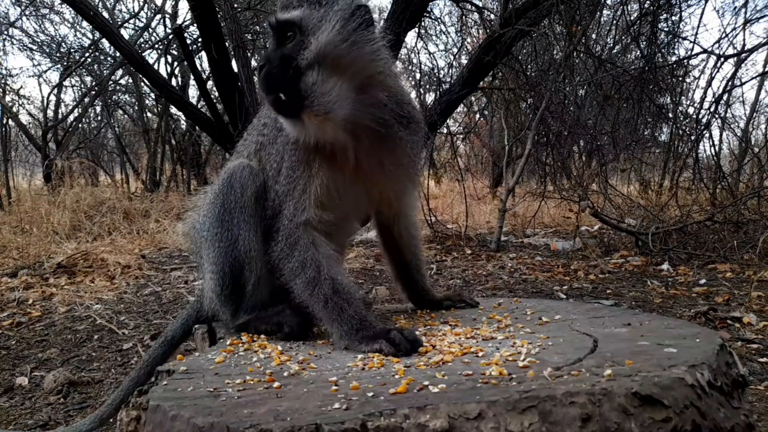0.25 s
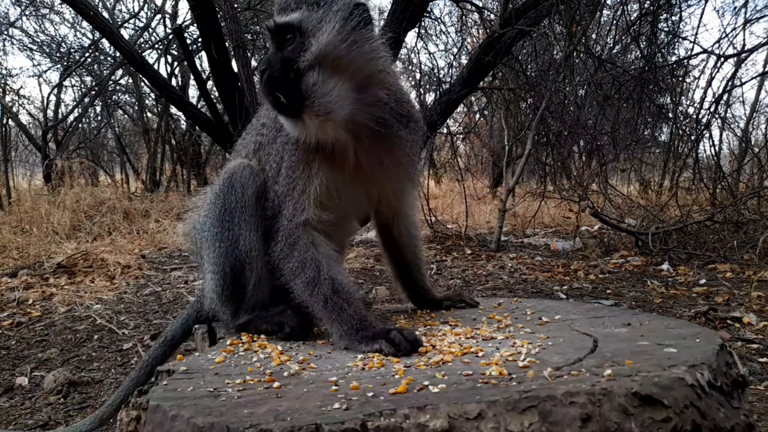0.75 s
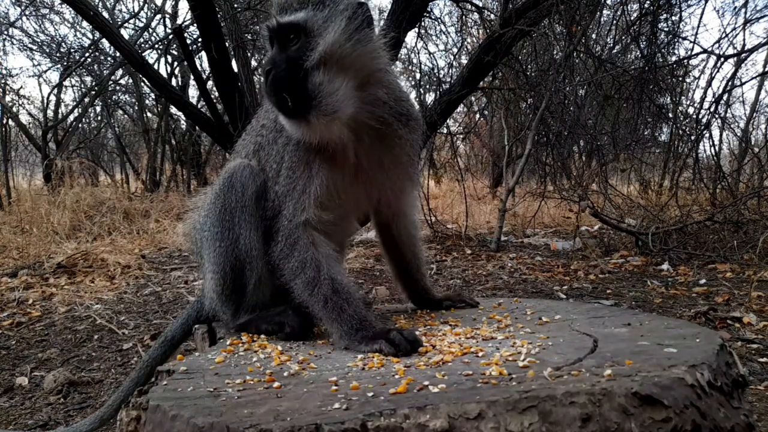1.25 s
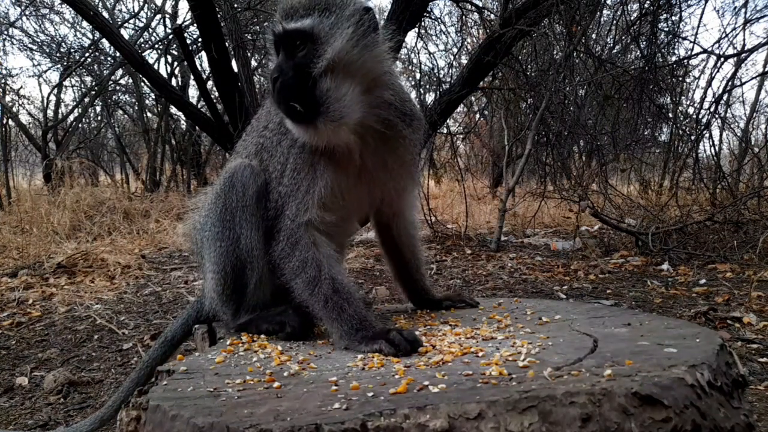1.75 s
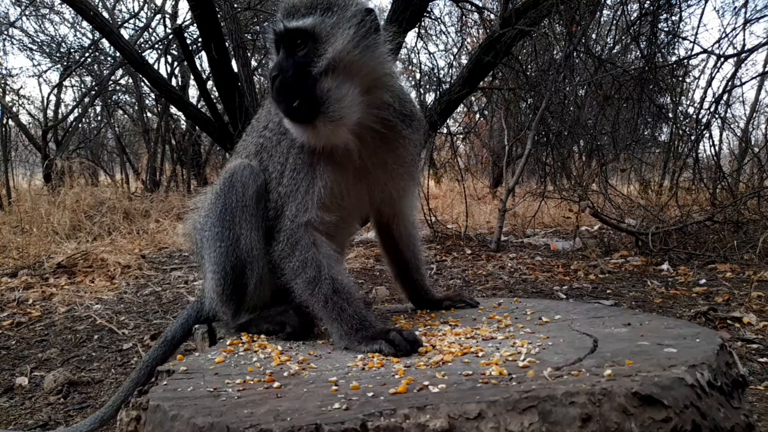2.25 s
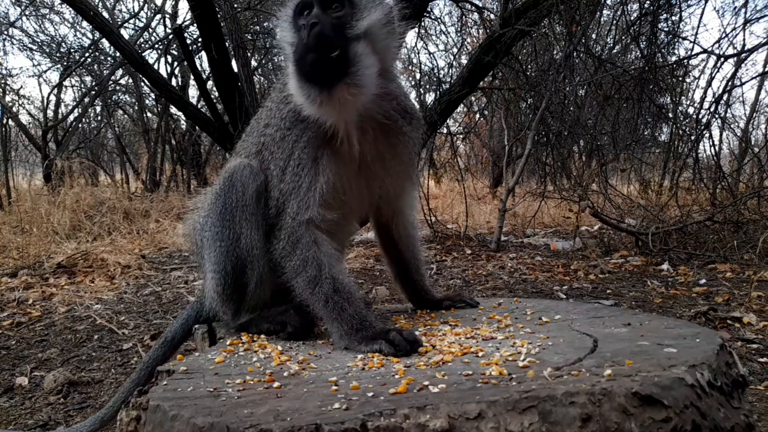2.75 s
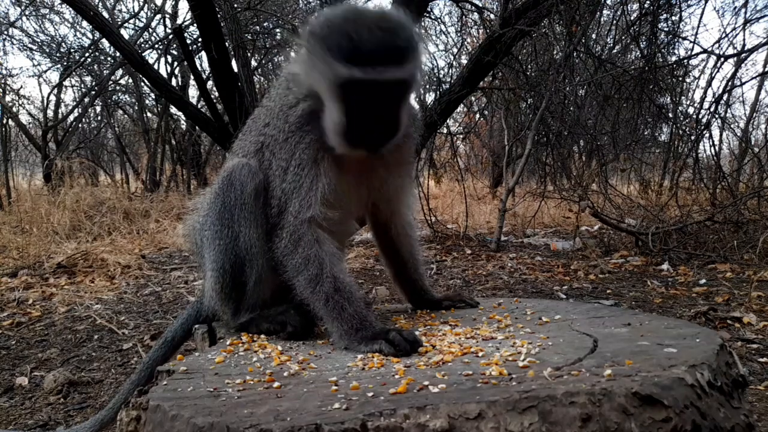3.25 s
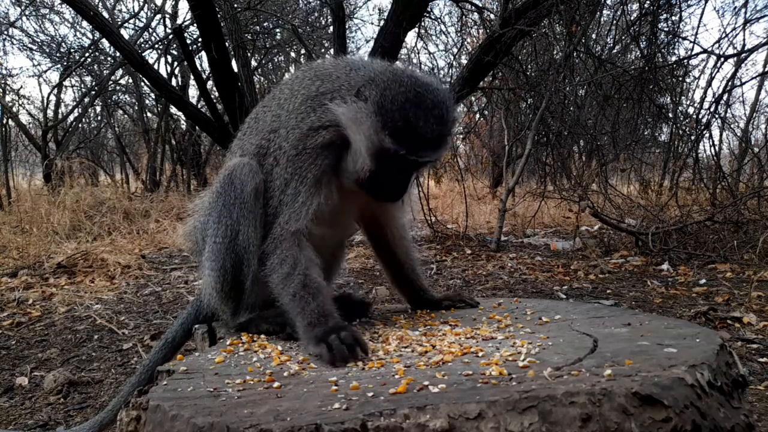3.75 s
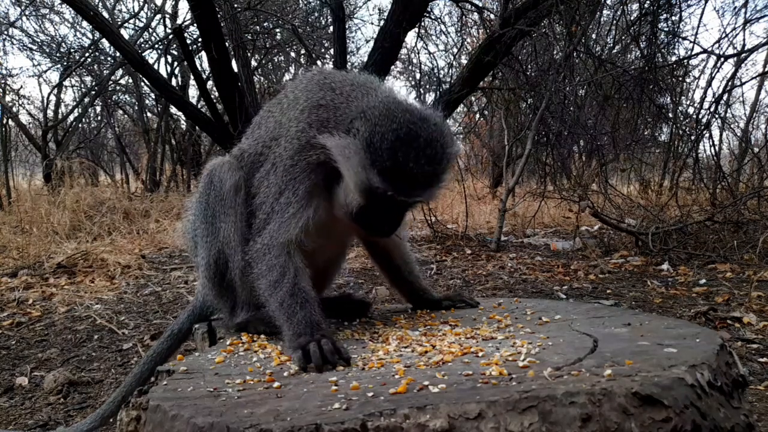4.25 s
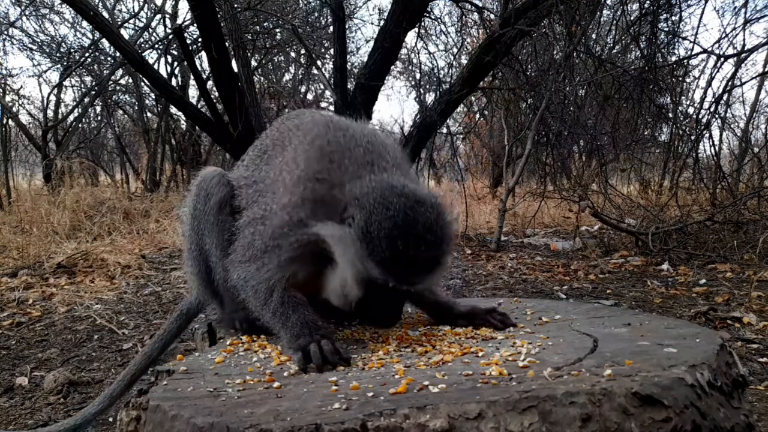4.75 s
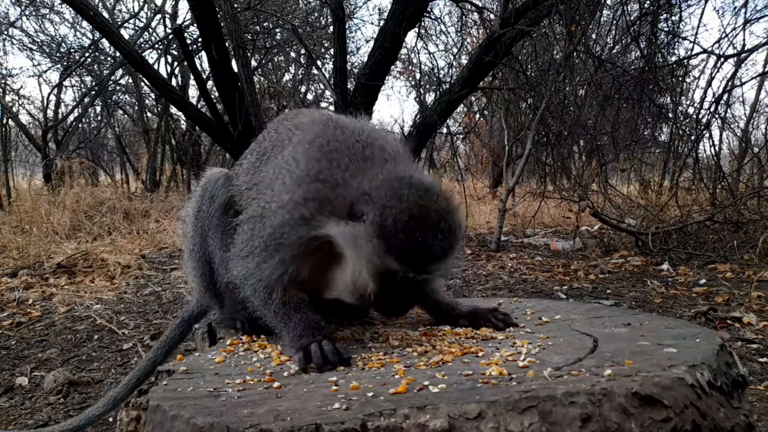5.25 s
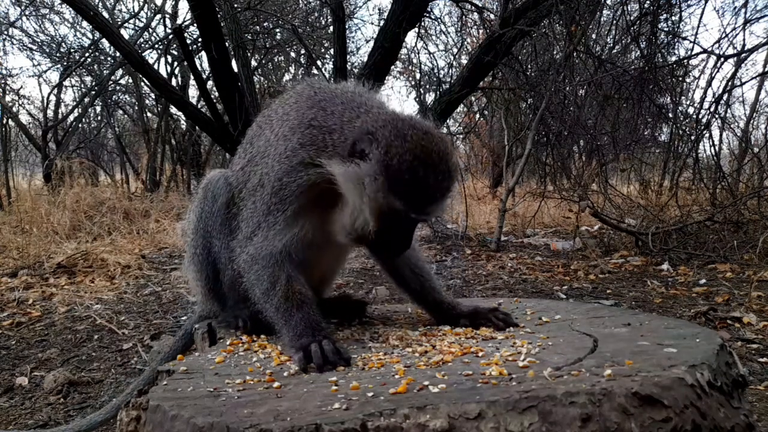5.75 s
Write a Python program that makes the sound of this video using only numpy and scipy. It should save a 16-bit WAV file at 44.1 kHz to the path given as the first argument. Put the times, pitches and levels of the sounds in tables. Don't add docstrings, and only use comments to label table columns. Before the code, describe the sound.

Quiet dry bush: faint kernel cracks and tiny ticks from a chewing monkey, then one deep wooden thump and soft taps on a stump.

```python
import sys
import numpy as np
from scipy import signal
from scipy.io import wavfile

SR = 44100
rng = np.random.default_rng(int(sys.argv[2]) if len(sys.argv) > 2 else 0)


def to_wav(sig):
    pcm = np.clip(np.atleast_2d(sig), -1, 1) * 32767
    pcm = np.round(pcm).astype(np.int16)
    wavfile.write(sys.argv[1], SR, pcm.T)


N = 264644


def from_db(db):
    return 10 ** (np.asarray(db, float) / 20)


def rms_one(x):
    return x / np.sqrt(np.mean(x ** 2) + 1e-20)


def in_time(rows):
    s, *columns = np.transpose(rows)
    return [np.interp(np.arange(N) / SR, s, column) for column in columns]


def at_hz(points, hz):
    point_hz, db = np.transpose(points)
    return np.interp(np.log(hz), np.log(point_hz), db, -90, None)


def pan(x, left_db, lag_s=0.):
    late = np.interp(np.arange(N) - lag_s * SR, np.arange(N), x)
    return np.array([x * from_db(left_db / 2), late * from_db(-left_db / 2)])


def drift(rate):
    r = np.exp(-80 * np.pi * rate / SR)
    slow = signal.lfilter([1], [1, -2 * r, r * r], rng.standard_normal(N // 40 + 2002))[2000:]
    return np.interp(np.arange(N) / 40, np.arange(len(slow)), rms_one(slow))


def ring(force, hz, t60):
    r, w = from_db(-60 / (t60 * SR)), 2 * np.pi * hz / SR
    return signal.lfilter([0, np.sin(w)], [1, -2 * r * np.cos(w), r * r], force + 1e-18)


def soft_onset(t, rise_s):
    return 1 - np.exp(-t / rise_s)


def soft_note(t, db, hz, t60, rise_s):
    return from_db(db - 60 * t / t60) * soft_onset(t, rise_s) * np.sin(2 * np.pi * hz * t)


def resonant_noise(hz, width_hz, channels, size=N):
    r = np.exp(-np.pi * width_hz / SR)
    section = [1, 0, -1, 1, -2 * r * np.cos(2 * np.pi * hz / SR), r * r]
    noise = rng.standard_normal((channels, size + SR // 2))
    return rms_one(signal.sosfilt([section, section], noise)[:, SR // 2:])


def near_echoes(x, level_db, t60):
    t = np.arange(round(.08 * SR)) / SR
    dull = signal.lfilter([1], [1, -.6], rng.standard_normal((2, len(t))))
    tail = dull * from_db(-60 * t / t60) * (t > .0015)
    return x + from_db(level_db) * signal.fftconvolve(x, tail, axes=1)[:, :N]


def swell_db(s, rise_s, hold_s, fall_db_per_s):
    t = np.arange(N) / SR - s
    return 36.5 * np.minimum(t, 0) / rise_s - fall_db_per_s * np.maximum(t - hold_s, 0)


# (time [s], cheek level [dB], mouth level [dB], mouth note [Hz])
CRACKS = [(0.1618, -58.5, -63, 1510), (0.1706, -56, -61.5, 2010), (0.6508, -58, -52, 1730),
          (0.6541, -63, -51, 1900), (0.6645, -65, -66, 2060), (1.229, -75, -71, 2070),
          (1.393, -70, -69, 1700), (1.465, -63.5, -63.5, 2080), (1.4797, -65, -65, 2140),
          (1.706, -58.5, -62.5, 1850), (1.7561, -82, -74, 2000), (1.76, -47, -44.5, 2160),
          (2.111, -60, -65, 1360), (3.4929, -60.5, -56, 1870), (3.4949, -61, -62, 2420),
          (4.222, -67.5, -61, 2080)]
# (time [s], dull level [dB], dull note [Hz], hard level [dB], hard note [Hz])
KNOCKS = [(3.472, -66, 511, -89, 1890), (3.730, -41.5, 695, -58, 1500), (3.760, -39, 736, -56, 1600),
          (3.765, -57.5, 1000, -46.5, 1600), (3.736, -38.5, 635, -45, 1250), (3.784, -55, 800, -63, 1797),
          (3.858, -56, 597, -68, 1250), (3.889, -75, 1050, -73, 1380), (3.895, -74, 1050, -74, 1250),
          (3.904, -70, 1150, -67, 1980), (5.2585, -56, 910, -71, 2210), (5.264, -70, 1110, -62.5, 2400),
          (5.511, -69, 494, -67, 1250), (5.632, -55.5, 610, -70, 1300), (5.764, -69, 646, -80, 2120)]


def cracks():
    out, size = np.zeros(N + 2000), 1300
    t = np.arange(size) / SR
    click = (t == 0) * 1.
    rows = [(s, cheek_db, 775 + 15 * rng.standard_normal(), mouth_db, mouth_hz)
            for s, cheek_db, mouth_db, mouth_hz in CRACKS]
    rows += KNOCKS
    fragments = rng.standard_normal((len(rows), size))
    for (s, dull_db, dull_hz, hard_db, hard_hz), ragged in zip(rows, fragments):
        splinter = click + .1 * ragged * np.exp(-t / .001)
        hollow = soft_onset(t, 0.00079) * ring(click, dull_hz, 0.0099)
        hard = soft_onset(t, 0.00022) * ring(splinter, hard_hz, 0.0042)
        shell_edge = ring(splinter, 3800, 0.006)
        sound = from_db(dull_db + 14.0) * hollow + from_db(hard_db + 11.0) * hard
        sound += from_db(hard_db + 1.0) * shell_edge
        out[round((s + .0008) * SR):][:size] -= sound
    return out[:N]


# (time [s], level [dB], ping [Hz])
PICKS = [(0.281, -62, 1950), (2.2047, -54, 2030), (2.211, -68, 2010), (2.219, -60, 2050),
         (4.962, -66, 2260), (4.976, -71, 2300), (4.9845, -59.5, 2310), (5.006, -74, 2300),
         (5.0255, -72, 1950), (5.032, -64, 2000), (5.039, -70, 2000), (5.169, -62, 1660),
         (5.2295, -63, 1950), (5.390, -63, 2150), (5.407, -63, 2100), (5.765, -68, 2050),
         (5.938, -66, 2150)]


def picks():
    out, t = np.zeros(N + 1500), np.arange(1500) / SR
    for s, db, hz in PICKS:
        out[round(s * SR):][:1500] += soft_note(t, db, hz, t60=0.016, rise_s=0.00058)
    return out[:N]


# (time [s], tick level [dB], tick note [Hz], snap level [dB])
TICKS = [(0.17, -55, 5900, -83), (0.205, -59, 5800, -80), (0.211, -62, 5700, -85), (0.3288, -67, 4750, -71),
         (0.655, -64, 5600, -75), (0.663, -64, 5560, -80), (0.9315, -61, 6390, -86),
         (1.0176, -66, 6130, -72), (1.4655, -56.5, 6000, -87), (1.7552, -55, 6700, -70),
         (1.7603, -52, 6240, -67), (2.207, -59.5, 6630, -70), (2.831, -68, 6390, -71),
         (3.493, -70, 4530, -82), (3.779, -64, 10500, -69), (3.858, -59.5, 4500, -85),
         (3.9044, -59, 10700, -73), (3.905, -63, 8000, -85), (4.2228, -56, 4550, -64),
         (4.6594, -69, 6400, -74), (4.6935, -68, 6500, -73), (4.9617, -62, 5430, -67),
         (5.0255, -63, 5400, -78), (5.032, -66, 5300, -83), (5.055, -68, 4950, -86.5),
         (5.149, -66, 6840, -58.5), (5.168, -58.5, 5250, -76), (5.23, -70, 5220, -67),
         (5.235, -74, 5600, -69), (5.2614, -57.5, 4740, -66), (5.3625, -61.5, 5800, -85),
         (5.3901, -62, 4950, -77), (5.8367, -59, 5870, -78), (5.938, -67, 5650, -70),
         (5.766, -66, 4200, -85)]
TICK_LEFT_DB, SNAP_LEFT_DB = -1.5, 9


def ticks():
    out, size = np.zeros((2, N + 1000)), 500
    sides = np.array([[.5], [-.5]])
    t = np.arange(size) / SR
    fragments = rng.standard_normal((len(TICKS), 2, 2, size))
    for (s, tick_db, tick_hz, snap_db), ragged in zip(TICKS, fragments):
        splinter = (t == 0) + 0.61 * ragged * np.exp(-t / 0.0011)
        tick = soft_onset(t, 0.00008) * ring(splinter[0], tick_hz, 0.0022)
        snap = np.diff(ring(splinter[1], 12000, 0.00018), prepend=0) / 2
        sound = from_db(tick_db + 1.15 + TICK_LEFT_DB * sides) * tick
        sound += from_db(snap_db + 16.5 + SNAP_LEFT_DB * sides) * snap
        out[:, round((s + .0008) * SR):][:, :size] += sound
    return out[:, :N]


LANDING_S, LANDING_LENGTH_S, LANDING_DB = 3.7324, .036, -13.5
LANDING_HZ, LANDING_FALL_HZ_PER_S, LANDING_GLIDE_S = 206, 5500, .0255


def landing():
    t = np.maximum(np.arange(N) / SR - LANDING_S, 0)
    glide = np.minimum(t, LANDING_GLIDE_S)
    cycles = LANDING_HZ * t - LANDING_FALL_HZ_PER_S * glide * (t - glide / 2)
    damping = np.exp(-np.maximum(t - LANDING_LENGTH_S, 0) / 0.0017)
    return -from_db(LANDING_DB) * soft_onset(t, 0.011) * damping * np.sin(2 * np.pi * cycles)


# (time of full weight [s], rise [s], hold [s], level [dB], knuckle knock above it [dB])
SHIFTS = [(3.761, 0.035, 0.019, -28, -1), (3.857, 0.041, 0.043, -32.5, -20),
          (3.986, 0.037, 0.092, -57.5, -6), (4.07, 0.17, 0.039, -54, -12),
          (4.355, 0.076, 0.0055, -49.5, -46), (5.114, 0.061, 0.098, -53, -14),
          (5.275, 0.057, .003, -41.5, -3.5), (5.577, 0.32, 0.015, -50, -8), (5.634, 0.024, 0.052, -58, 12),
          (5.73, 0.18, 0.11, -64, 5.5), (5.938, 0.04, 0.023, -60, 1)]
# (time [s], level [dB])
GRINDS = [
    (3.734, -34),
    (3.762, -57),
    (3.858, -77),
    (3.889, -65.5),
    (5.264, -59),
    (5.632, -73),
    (5.92, -68),
]


def weight():
    deep, knock, grit = np.zeros((3, N))
    for s, rise_s, hold_s, db, knock_db in SHIFTS:
        deep += from_db(db + swell_db(s, rise_s, hold_s, fall_db_per_s=181.5))
        knock += from_db(db + knock_db + swell_db(s, rise_s, 0.33 * hold_s, fall_db_per_s=226.5))
    for s, db in GRINDS:
        grit += from_db(db + swell_db(s, rise_s=0.01, hold_s=0.0042, fall_db_per_s=607))
    return deep, knock, grit


# (time [s], weight level [dB], finger level [dB], contact sharpness [Hz], push 1 or lift -1)
BLOWS = [(3.7317, -14.5, -17, 910, 1), (3.7440, -27, -21.5, 500, 1), (3.760, -18, -19, 890, 1),
         (3.773, -28, -39, 403, -1), (3.799, -23.5, -37, 400, 1), (3.861, -30, -29, 501, 1),
         (3.890, -27, -33.5, 700, 1), (3.921, -37, -35, 290, 1), (4.362, -47, -59, 202, 1),
         (5.123, -52.5, -53, 300, 1), (5.272, -40.5, -61, 150, 1), (5.54, -54, -67, 300, 1),
         (5.584, -50.5, -73, 300, 1)]
# (note [Hz], level [dB], t60 [s])
STUMP = [(63, -7.5, 0.061), (85.4, 1, 0.19), (120.5, -5, 0.18), (137, 0, 0.12), (174, -7, 0.14),
         (202, -14.5, 0.13), (250, -40, .06), (293, -7.5, 0.11), (365, -20, 0.05), (410, -22, 0.04),
         (486, -27, 0.06), (647, -18, 0.09), (732, -22, 0.06), (931, -29, 0.05), (1044, -19, 0.06),
         (1212, -22, 0.03), (1322, -19, 0.06), (1625, -24.5, 0.038), (2150, -29.5, 0.06)]


def stump():
    force, t = np.zeros((2, N + 2000)), np.arange(2000) / SR
    for s, weight_db, finger_db, sharp_hz, push in BLOWS:
        contact = t * np.exp(-2 * np.pi * sharp_hz * t)
        levels = from_db([[weight_db], [finger_db]])
        force[:, round(s * SR):][:, :2000] += np.sign(push) * levels * contact / contact.sum()
    lumps = from_db(2.55 * drift(24)) * rng.standard_normal(N)
    struck, rolling = np.zeros((2, N)), np.zeros((3, N))
    for k, (hz, db, t60) in enumerate(STUMP):
        travel = round(0.0033 * np.sqrt(100 / hz) * SR)
        by_finger, bright = int(hz > 160), int(hz > 500)
        blow = ring(force[by_finger, :N - travel], hz, t60)
        struck[bright, travel:] += (-1) ** k * from_db(db) * blow
        rolling[by_finger + bright] += from_db(db) * ring(lumps, hz, 0.58 * t60)
    deep, knock, grit = (level * from_db(-5) * rms_one(band) for level, band in zip(weight(), rolling))
    low = pan(landing() + struck[0] + deep + knock, -3.0, .00007)
    return low + near_echoes(pan(struck[1] + grit, 0.43, 0.00021), -27, 0.043)


# (time [s], level [dB], note [Hz], t60 [s])
TAPS = [(3.976, -43.5, 310, 0.083), (3.982, -52, 530, 0.037), (4.056, -61, 570, .04),
        (4.056, -44.5, 386, 0.032), (4.074, -40.5, 285, 0.026), (5.111, -50.5, 193, .06),
        (5.165, -59.5, 250, 0.1), (5.209, -49.5, 199, 0.058), (5.2607, -39.5, 1035, 0.029),
        (5.284, -52, 1040, 0.028), (5.263, -43.5, 291, 0.1), (5.268, -63, 206, 0.044),
        (5.570, -58, 295, 0.067), (5.612, -46, 297, 0.097), (5.632, -49.5, 486, 0.078),
        (5.636, -61, 734, 0.027), (5.652, -46.5, 207, 0.09), (5.676, -60, 330, 0.043),
        (5.709, -45, 400, 0.039), (5.736, -57, 263, 0.075), (5.762, -51, 416, 0.047),
        (5.92, -48, 227, 0.068), (5.92, -41.5, 415, 0.021), (5.945, -57, 329, 0.092)]


def taps():
    out, t = np.zeros(N + 5000), np.arange(5000) / SR
    for s, db, hz, t60 in TAPS:
        out[round(s * SR):][:5000] += soft_note(t, db, hz, t60, rise_s=0.0026)
    return out[:N]


def scatter():
    since = np.maximum(np.arange(N) / SR - 3.7305, 0)
    grains = from_db(3.6 * drift(140)) * soft_onset(since, 0.0045)
    burst = from_db(-63 - 60 * since / 0.065) * resonant_noise(2300, 6000, channels=2)
    body = from_db(-39 - 60 * since / 0.08) * resonant_noise(1300, 1600, channels=2)
    body = 0.62 * (body + 0.55 * body[::-1])
    patter = from_db(-63 - 60 * since / 0.5) * resonant_noise(2100, 3600, channels=2)
    return grains * (burst + body + patter)


# (time [s], level [dB])
RUSTLE = [(0.0, -76), (0.3, -77), (0.68, -79), (1.0, -79), (1.29, -81.5), (1.38, -76.5), (1.64, -78),
          (1.79, -78), (2.34, -79), (2.7, -82.5), (3.16, -77), (4.06, -78), (4.48, -79), (4.9, -80.5),
          (5.2, -76), (5.48, -79.5), (6.0, -77.5)]
# (time [s], length [s], centre [Hz], width [Hz], level [dB])
PUFFS = [(-.05, 0.35, 1360, 520, -80), (0.202, 0.19, 1880, 490, -83), (0.897, 0.24, 2150, 490, -86.5),
         (1.196, 0.21, 2150, 430, -86), (2.927, 0.35, 1980, 320, -79.5), (2.946, 0.29, 4600, 1300, -78.5),
         (3.537, 0.12, 5450, 1200, -78), (4.63, 0.12, 11700, 8000, -82), (3.744, 0.25, 12400, 7000, -76.5),
         (5.097, 0.26, 12800, 5000, -76), (2.955, 0.31, 380, 440, -73), (0.846, 0.19, 88.5, 25, -70.5),
         (1.401, 0.2, 71.3, 12, -61), (3.404, 0.25, 900, 1400, -77), (4.954, 0.11, 2200, 540, -81),
         (5.365, 0.084, 2140, 440, -81)]


def rustle():
    bright_db, = in_time(RUSTLE)
    throat_db = -86 + 2 * (bright_db - bright_db.mean())
    out = from_db(throat_db - 4.0 + 1.8 * drift(40)) * resonant_noise(1950, 820, channels=2)
    out += from_db(bright_db + 0.5 + 1.66 * drift(60)) * resonant_noise(5390, 3600, channels=2)
    flutter = from_db(2.3 * drift(43))
    for s, length_s, hz, width_hz, db in PUFFS:
        start, size = max(round(s * SR), 0), round(length_s * SR)
        progress = (np.arange(start, start + size) / SR - s) / length_s
        swell = from_db(db) * np.sin(np.pi * np.clip(progress, 0, 1))
        breath = resonant_noise(hz, width_hz, channels=2, size=size)
        out[:, start:start + size] += swell * flutter[start:start + size] * breath
    return out


# (frequency [Hz], left-right likeness [0 to 1, clipped])
LIKENESS = [(60, 0.56), (180, 0.5), (550, -0.04), (1650, 1.5), (4970, -3.2), (15000, 0.1)]
# (frequency [Hz], left minus right [dB])
LEAN = [(60, -5), (150, -4.5), (380, -4.5), (950, -1.5), (2380, -1.5), (5980, -4), (15000, 3.5)]


def banded_noise(spectrum, low_hz, count, patchy_db):
    out, edges = 0, np.minimum(low_hz * 2 ** (np.arange(count + 1) / 3), .45 * SR)
    like_hz, likeness = np.transpose(LIKENESS)
    lean_hz, lean_db = np.transpose(LEAN)
    white = rng.standard_normal((2, 2, N))
    for k, (low, high) in enumerate(zip(edges, edges[1:])):
        band = signal.butter(2, [low, high], "band", fs=SR, output="sos")
        mid, side = signal.sosfilt(band, white[k % 2])
        hz = np.sqrt(low * high)
        alike = np.clip(np.interp(np.log(hz), np.log(like_hz), likeness), 0, 1)
        lean = np.interp(np.log(hz), np.log(lean_hz), lean_db)
        gain = from_db(at_hz(spectrum, hz) + patchy_db * drift(13)) * from_db([[lean / 2], [-lean / 2]])
        out = out + gain * (np.sqrt(1 + alike) * mid + np.sqrt(1 - alike) * side * [[1], [-1]])
    return out / np.sqrt(np.mean(out.mean(0) ** 2))


# (time [s], level [dB])
FAR = [(0.0, -64.5), (0.27, -65), (0.4, -60), (0.73, -67), (0.98, -60), (1.25, -67), (1.9, -61),
       (2.22, -65.5), (2.54, -63), (3.12, -65.5), (3.48, -64), (4.11, -61.5), (4.22, -67), (4.9, -61),
       (5.13, -71), (5.23, -54.5), (5.5, -64.5), (6.0, -62.5)]
# (frequency [Hz], density [dB per Hz])
AIR = [(25, -21), (40, -9), (60, -3), (85, 2), (130, -7.5), (200, -16), (350, -16), (600, -21.5),
       (900, -30.5), (1500, -45.5)]
# (frequency [Hz], density [dB per Hz])
HISS = [(530, -31), (900, -6), (1070, -2.5), (1190, -10), (1490, 4), (1720, -18.5), (1950, -3.5),
        (3070, -6), (4860, -3), (6110, -5.5), (7060, -22), (8870, -10), (14200, -0.5), (15200, -6),
        (16000, -6)]
AIR_DB, HISS_DB = -65.5, -75.5


def background():
    drone_db, stir_db = in_time(FAR) + in_time(RUSTLE)
    sway = 1 + from_db(11 + swell_db(3.88, rise_s=0.27, hold_s=0, fall_db_per_s=159))
    phase = 2 * np.pi * np.cumsum(47.1 + 0.58 * drift(1.67)) / SR
    drone = pan(from_db(drone_db + 1.0 + 0.72 * drift(7.1)) * np.sin(phase), -10.5, 0.00031)
    air_db = AIR_DB - 0.6 * drift(1.1) + 0.29 * (stir_db - stir_db.mean())
    air = from_db(air_db) * banded_noise(AIR, 28.22, count=17, patchy_db=1.15)
    hiss = from_db(HISS_DB - 2.5) * banded_noise(HISS, 894.0, count=13, patchy_db=1.1)
    return sway * (drone + air) + hiss


def scene():
    head_lag_s = np.interp(np.arange(N) / SR, [2.3, 3.4], [.00014, .00004])
    mouth = near_echoes(pan(cracks() + picks(), -.6, head_lag_s) + ticks(), -35.0, 0.057)
    return mouth + stump() + pan(taps(), -5.0, .0001) + scatter() + rustle() + background()


def band_limit(x):
    return signal.sosfilt(signal.butter(12, 16470, fs=SR, output="sos"), x)


def record(dry):
    no_bass = signal.sosfilt(signal.butter(4, 40, "high", fs=SR, output="sos"), dry)
    rounded = 0.44 * np.tanh(no_bass / 0.46)
    no_top = signal.sosfilt(signal.ellip(12, .5, 40, 15750, fs=SR, output="sos"), rounded)
    return band_limit(no_top)


dry = scene()
out = record(dry)
to_wav(out)
```